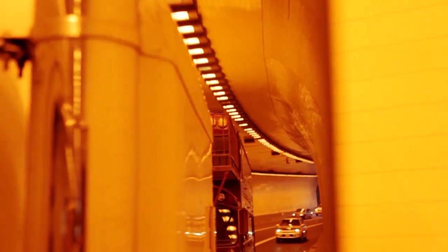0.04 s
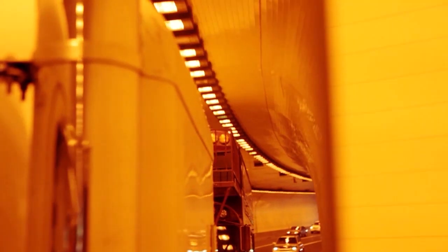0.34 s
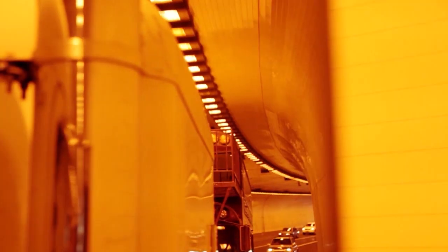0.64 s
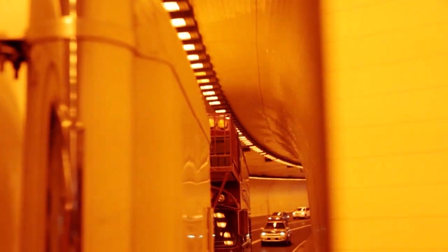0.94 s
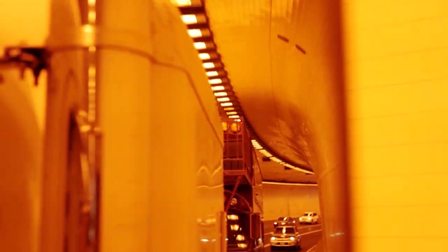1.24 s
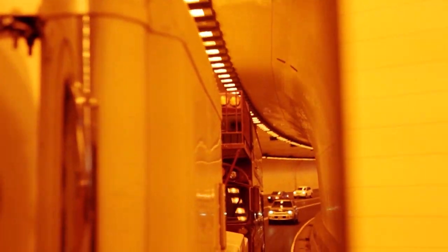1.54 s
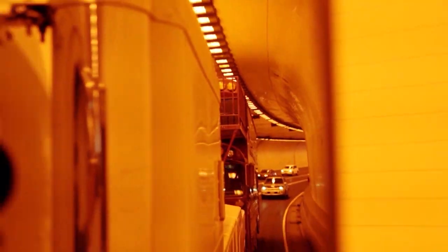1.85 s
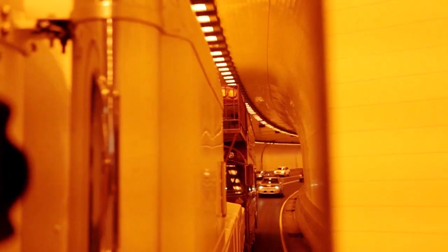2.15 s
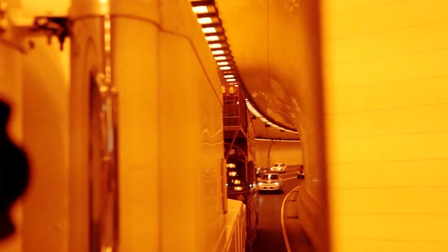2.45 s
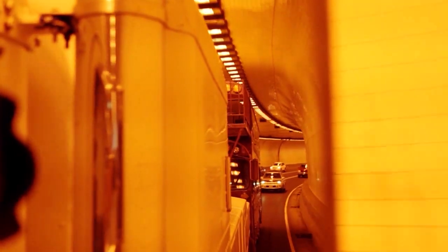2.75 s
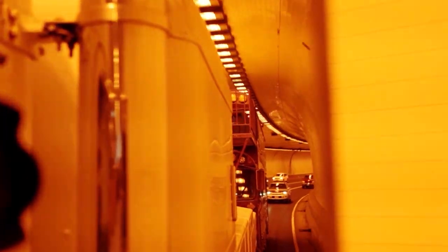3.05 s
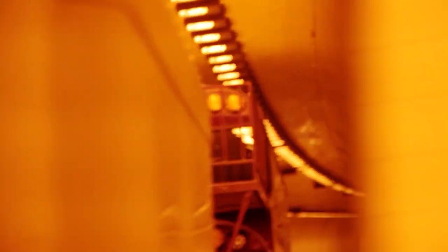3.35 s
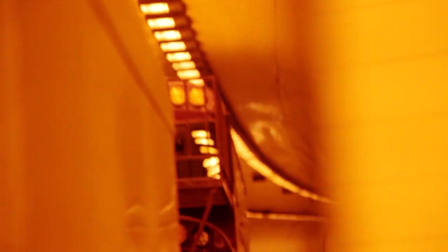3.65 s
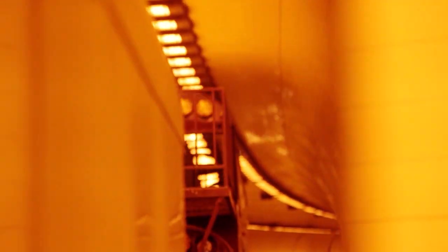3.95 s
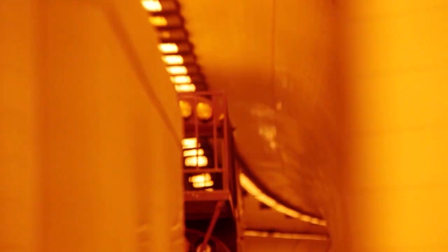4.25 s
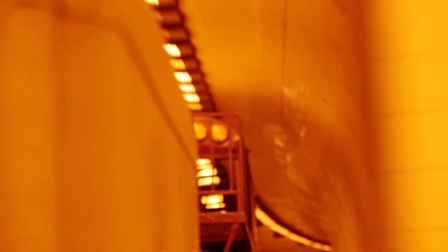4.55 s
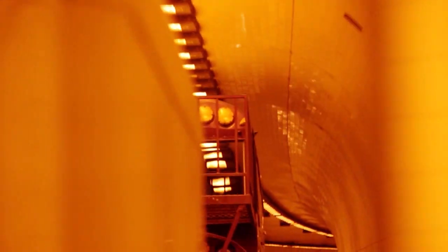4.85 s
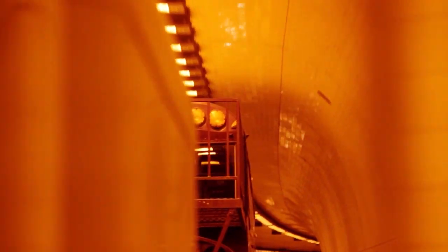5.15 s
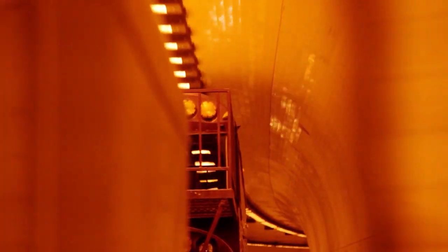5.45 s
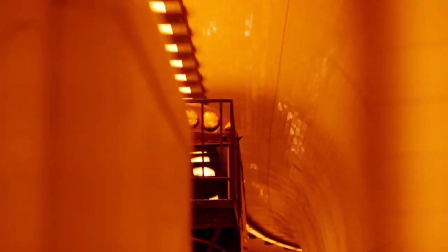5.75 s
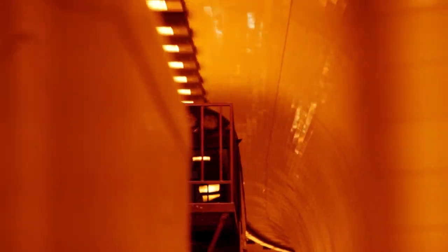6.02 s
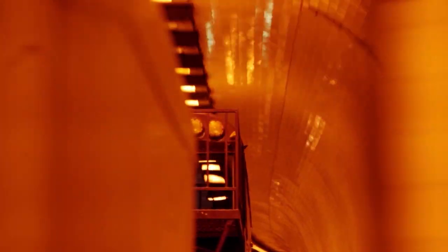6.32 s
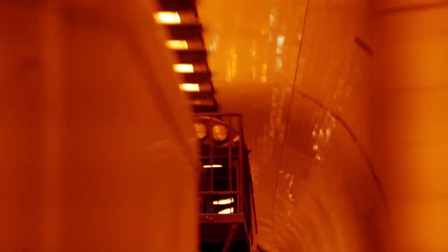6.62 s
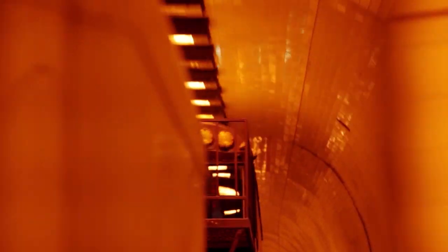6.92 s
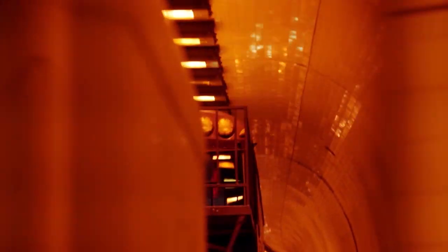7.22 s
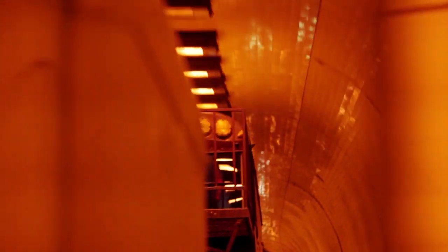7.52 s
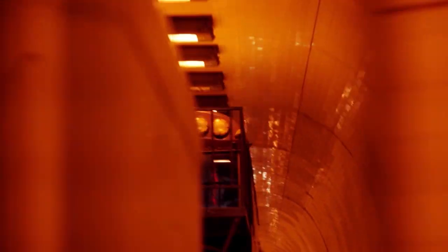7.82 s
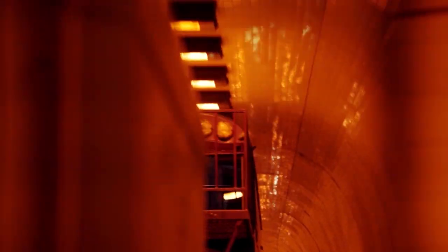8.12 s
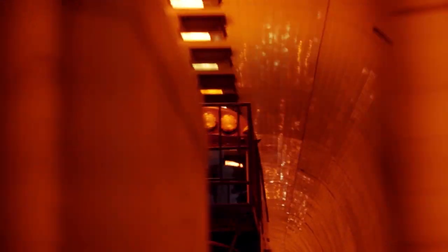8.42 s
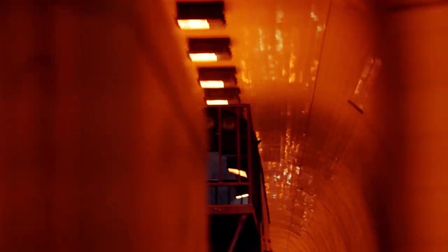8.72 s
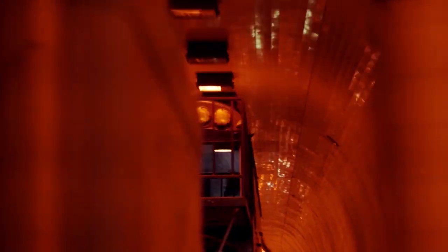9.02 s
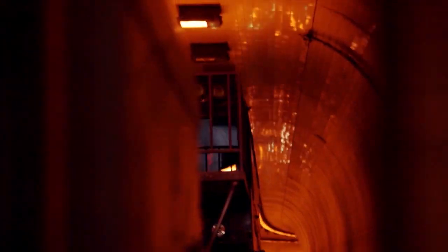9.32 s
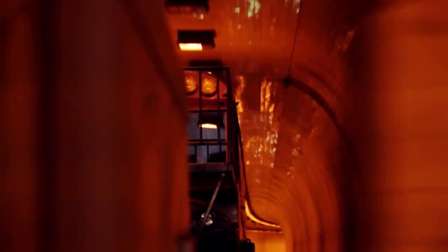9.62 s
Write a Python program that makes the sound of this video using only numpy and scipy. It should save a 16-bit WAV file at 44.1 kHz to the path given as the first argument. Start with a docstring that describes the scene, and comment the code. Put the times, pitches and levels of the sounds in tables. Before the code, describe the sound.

Heard from a work vehicle moving close to a road tunnel's wall, a diesel engine runs loudly and evenly throughout, with a booming, raspy exhaust and rapid knocking clatter. At the start there is a soft low gust on the microphone, a tiny metal squeak and a brief thin hiss. The drone then carries on over a dull tunnel roar, its upper tones slowly rising and falling in strength.

```python
"""A six-cylinder diesel drones at about 1600 rpm, heard on board a work vehicle in a road tunnel.
Uneven firings ring the exhaust pipe and knock on the block, which growls and clatters; its higher
tones swell and fade as the close walls slide by. Behind it are the tunnel's roar, a little wind on
the microphone and, in the first second, a faint squeak and a thin hiss."""
import sys
import numpy as np
from scipy import signal
from scipy.fft import rfft, irfft, next_fast_len
from scipy.io import wavfile
from scipy.ndimage import map_coordinates

SR = 44100
rng = np.random.default_rng(int(sys.argv[2]) if len(sys.argv) > 2 else 0)


def wrap_up_sound(samples):
    """Save the sound to the file named by the first command line argument, as 16-bit audio."""
    columns = np.atleast_2d(samples).T
    # keep every value between -1 and 1, then stretch to whole-number steps
    tamed = np.clip(columns, -1, 1)
    steps = np.round(tamed * 32767).astype(np.int16)
    wavfile.write(sys.argv[1], SR, steps)


N = 430857
TIME = np.arange(N) / SR

# slowly sagging engine speed: (time [s], speed [rpm])
ENGINE_RPM = [(0.0, 1635.4), (0.8, 1631.0), (1.6, 1624.7), (2.4, 1620.3), (3.0, 1615.4), (4.0, 1610.6),
              (5.0, 1604.6), (6.0, 1600.2), (7.0, 1599.0), (8.0, 1598.0), (9.0, 1597.6), (9.77, 1598.0)]


def amp(db):
    """Decibels to gain."""
    return 10 ** (np.asarray(db) / 20)


def unit_rms(x):
    """Scales to rms 1."""
    return x / np.sqrt(np.mean(abs(x) ** 2) + 1e-20)


def curves(rows):
    """Each column after the first as a curve over time."""
    times_s, *columns = np.transpose(rows)
    return [np.interp(TIME, times_s, column) for column in columns]


def hump(middle_s, length_s, flatness=2):
    """Smooth rise and fall of height 1; flatness 2 is a bell, more tends to a plateau."""
    return np.exp(-abs(2 * (TIME - middle_s) / length_s) ** flatness)


def drift(rate_hz, size=2048):
    """Slow complex random curve of rms 1, up to about rate_hz."""
    hz = np.fft.fftfreq(size, TIME[-1] / size)
    white = rng.standard_normal(size) + 1j * rng.standard_normal(size)
    slow = np.fft.ifft(np.exp(-(hz / rate_hz) ** 2) * white)
    return np.interp(TIME, np.linspace(0, TIME[-1], size), unit_rms(slow))


def coloured(x, spectrum, rings=()):
    """Shapes x by a spectrum with narrow rings on top; rms 1."""
    size = next_fast_len(N)
    hz = np.fft.rfftfreq(size, 1 / SR)
    points_hz, points_db = np.transpose(spectrum)
    db = np.interp(np.log(hz + 1), np.log(points_hz + 1), points_db)
    db += sum(lift / (1 + (2 * (hz - centre) / width) ** 2) for centre, width, lift in rings)
    return unit_rms(irfft(rfft(x, size) * amp(db), size)[:N])


def noise(spectrum):
    """Noise of rms 1 with the given spectrum."""
    return coloured(rng.standard_normal(N), spectrum)


def tunnel_roar(knock, level_db=-30.5, wander_db=.8, throb=.14):
    """Tyres and engine blurred by the tunnel, throbbing a little with the knocks."""
    # (frequency [Hz], relative density [dB])
    spectrum = [(20, -59), (70, 0.5), (110, -9), (170, -0.5), (235, -3.5), (275, -15), (330, 1),
                (390, -4.5), (550, -3.5), (670, -10), (900, -7.5), (1330, -15), (1550, -22), (3000, -59)]
    gain = amp(level_db + wander_db * drift(3).real)
    return gain * unit_rms(noise(spectrum) * (1 + throb * knock))


def wind(breeze_db=-40, lumps_db=5, gust_db=-25):
    """Low, lumpy buffeting on the microphone and one early gust."""
    # (frequency [Hz], relative density [dB])
    spectrum = [(4, 10), (12, 1), (28, 0), (50, -3), (100, -10), (300, -68)]
    breeze = amp(breeze_db + lumps_db * drift(1.5).real)
    gust = amp(gust_db) * hump(middle_s=.22, length_s=.55)
    return (breeze + gust) * noise(spectrum)


def hiss(level_db=-52):
    """One short, thin, very high hiss."""
    # (frequency [Hz], relative density [dB])
    spectrum = [(9000, -62), (11400, -17), (12000, 2), (13500, -4), (15600, -5)]
    return amp(level_db) * hump(middle_s=.635, length_s=.08) * noise(spectrum)


def body_squeak(level_db=-42, pitch_hz=3770):
    """Bodywork metal rubs in one short, wavering chirp."""
    tone = np.sqrt(2) * np.cos(2 * np.pi * pitch_hz * TIME + drift(30).real)
    return amp(level_db) * hump(middle_s=.355, length_s=.05) * tone


def crank_turns(first_firing_turns=.115, wobble_turns=.0023):
    """Crankshaft turns since the first firing, slightly unsteady."""
    rpm, = curves(ENGINE_RPM)
    return np.cumsum(rpm) / 60 / SR - first_firing_turns + wobble_turns * drift(6).real


def knock_envelope(turns, rise_gaps=.05, decay_gaps=.46, cylinders=6):
    """Combustion knocks, three a turn, timed in firing gaps; rms 1."""
    # cylinders in firing order: (relative knock [dB])
    cylinder_db = [-14, 0, -4, -14, -6, -8]
    firings = turns * cylinders / 2 + cylinders
    number, age = firings.astype(int), firings % 1
    scatter_db = rng.standard_normal(1024)
    strength = amp(np.take(cylinder_db, number % cylinders) + scatter_db[number])
    return unit_rms(strength * (1 - np.exp(-age / rise_gaps)) * np.exp(-age / decay_gaps))


def cycle_rattle(turns, renew_s, size=3000):
    """Noise that repeats every engine cycle (two turns) and slowly renews as the echoes change."""
    patterns = rng.standard_normal((128, size))
    place = turns / 2 % 1 * size
    stage, blend = np.divmod(TIME / renew_s, 1)
    old = map_coordinates(patterns, [stage, place], order=1, mode="grid-wrap")
    new = map_coordinates(patterns, [stage + 1, place], order=1, mode="grid-wrap")
    return unit_rms(old * np.cos(np.pi / 2 * blend) + new * np.sin(np.pi / 2 * blend))


def head_ping(turns, knock, level_db=-43, centre_hz=1987, width_hz=390):
    """The harder knocks briefly ring the cylinder head."""
    # (time [s], level offset [dB])
    offsets = [(0, -2), (2, 3), (6, -3), (8, -2)]
    offset_db, = curves(offsets)
    band = signal.butter(2, [centre_hz - width_hz / 2, centre_hz + width_hz / 2], "band", fs=SR)
    strikes = knock * cycle_rattle(turns, renew_s=.514)
    return amp(level_db + offset_db) * unit_rms(signal.lfilter(*band, strikes))


def clatter(turns, knock, level_db=-34, flicker_db=.72, fade_db=1.2, echo_s=.03, split_hz=6000):
    """Bright mechanical bursts at each knock, their wall echoes and an even wash, slowly softening."""
    # (frequency [Hz], relative density [dB])
    spectrum = [(900, -24.5), (1400, -4), (1550, -8), (2000, -4.5), (2300, -11), (2950, -9), (3300, -14.5),
                (4300, -19), (5000, -23), (6000, -26.5), (8000, -29.5), (12200, -30.5), (13800, -41),
                (15300, -53)]
    # engine parts: (frequency [Hz], width [Hz], lift [dB])
    rings = [(3710, 130, 2.5), (4310, 99, 4.5), (6740, 150, 5), (7240, 130, 5), (9000, 550, 2)]
    pole = np.exp(-1 / (echo_s * SR))
    echo_power = signal.lfilter([1 - pole], [1, -pole], knock ** 2)
    envelope = unit_rms(np.sqrt(.5 + .13 * knock ** 2 + .19 * echo_power))  # wash, bursts, echoes
    rattle = cycle_rattle(turns, renew_s=.6) + rng.standard_normal(N)
    body = signal.sosfiltfilt(signal.butter(1, split_hz, fs=SR, output="sos"), rattle)
    treble = rattle - body
    pulsed = body * envelope + treble * unit_rms(np.sqrt(envelope))  # treble pulses less
    gain = amp(level_db + flicker_db * drift(7.3).real + fade_db * (.5 - TIME / TIME[-1]))
    return gain * coloured(pulsed, spectrum, rings)


def block_growl(turns, knock, level_db=-26, throb=.34):
    """The block shudders alike in every cycle: a dense comb of tones, pulsing with the knocks."""
    # (frequency [Hz], relative density [dB])
    spectrum = [(120, -0.5), (235, 6), (330, 1.5), (400, -0.5), (500, 0), (660, -1.5), (800, -0.5),
                (900, -0.5), (1030, -7), (1230, -1), (1390, -0.5), (1540, -27.5), (2200, -39)]
    shudder = cycle_rattle(turns, renew_s=.4)
    return amp(level_db) * coloured(shudder * (1 + throb * knock), spectrum)


def block_tones(turns, trim_db=.46, rest_db=-41, lope=.22, twist_rad=.018, shimmer=.16):
    """The block's strongest tones wander faintly and swell as moving wall echoes reinforce them."""
    # (order [per turn])
    orders = [28, 31, 34, 37, 40, 43]
    # (middle [s], length [s], order [per turn], level before trim [dB])
    swells = [(.4, 1.1, 28, -34.5), (0.448, 1.34, 34, -29.5), (.45, 1.3, 40, -33), (1.148, 0.37, 43, -34),
              (1.35, 0.95, 31, -32), (2.085, 1.05, 40, -29), (2.7, 0.89, 43, -34.5), (2.9, 1, 31, -37.5),
              (3.1, 1.14, 34, -27.5), (3.9, 2.25, 28, -32), (4.102, 1.8, 43, -33.5), (5.15, 0.74, 40, -30),
              (5.55, 1.55, 34, -30), (6.5, 1.2, 37, -33.5), (6.545, 0.43, 43, -33.5),
              (6.7, 0.85, 40, -32.5), (8.2, 2.75, 34, -32), (9.355, 0.6, 43, -33)]
    angle = 2 * np.pi * (turns - 1 / 3)
    # the loudest cylinder fires every second turn: it lifts the tones and twists the crankshaft
    loping = 1 + lope * np.cos(angle / 2 - np.pi / 4)
    angle += twist_rad * np.sin(angle / 2)
    tones = np.zeros(N)
    for order in orders:
        gain = amp(rest_db) * drift(2.1)
        for middle_s, length_s, swell_order, swell_db in swells:
            if swell_order == order:
                gain += (amp(swell_db) - gain) * hump(middle_s, length_s, flatness=2.54)
        tones += (gain * (1 + shimmer * drift(3.7)) * np.exp(1j * order * angle)).real
    return np.sqrt(2) * amp(trim_db) * loping * tones


def pipe_phases(orders, crank_hz):
    """Phase [rad] of each tone as two strong puffs and a weak one per turn ring the exhaust pipe."""
    # (place [turns], relative size)
    puffs = [(-.011, 1.), (.343, 1.04), (.658, .37)]
    # (frequency [Hz], width [Hz], signed gain)
    resonances = [(209, 176, .37), (342, 18, -1.), (544, 131, -.29)]
    hz = orders * crank_hz
    drive = sum(size * np.exp(-2j * np.pi * orders * place) for place, size in puffs)
    response = sum(gain / (1 + 1j * (hz ** 2 - centre ** 2) / (hz * width))
                   for centre, width, gain in resonances)
    return np.angle(drive * response)


def exhaust(turns, rasp_trim_db=-.5, rasp_swing=1.26):
    """Uneven puffs make each turn a chug of boom and rasp; wall echoes shake the tones, the boom least."""
    # (order [per turn], base level [dB])
    harmonics = [(1, -48), (2, -41.9), (3, -29.2), (4, -42.0), (5, -34.9), (6, -25.8), (7, -32.4),
                 (8, -21.3), (9, -16.3), (10, -46.7), (11, -29.2), (12, -25.6), (13, -25.4), (14, -41.1),
                 (15, -38.3), (16, -34.4), (17, -35.4), (18, -29.7), (19, -32.8), (20, -33.6), (21, -35.5),
                 (22, -31.3), (23, -42.3)]
    # (order [per turn]); all higher orders form the rasp
    boom_orders = [3, 6, 8, 9, 12, 13]
    # only the swing about the mean counts: (time [s], boom [dB], rasp before rasp_swing [dB])
    swings = [(0.1, -17, -24), (0.63, -17, -25), (1.92, -15, -21.5), (3.03, -18, -24.5), (3.93, -15, -26),
              (5.23, -14.5, -24.5), (5.94, -13.5, -23), (6.26, -16.5, -23.5), (6.58, -14, -24),
              (7.06, -14.5, -23.5), (7.14, -14.5, -24.5), (8.59, -14.5, -23.5), (9.2, -14.5, -23.5),
              (9.6, -14.5, -24.5)]
    # tones on the flank of a pipe resonance follow the speed: (order [per turn], slope [dB/rpm])
    flanks = [(3, .08), (4, 0.41), (6, -0.01), (8, 0.1065), (11, .06), (13, -0.1841), (16, 0.11),
              (17, -.15), (19, 0.1374)]
    rpm, = curves(ENGINE_RPM)
    boom_db, rasp_db = (db - db.mean() for db in curves(swings))
    orders, levels_db = np.transpose(harmonics)
    phases = pipe_phases(orders, crank_hz=turns[-1] / TIME[-1])
    tones = np.zeros(N)
    for order, base_db, phase in zip(orders, levels_db, phases):
        if order in boom_orders:
            lift_db, flutter = boom_db, .11
        elif order > max(boom_orders):
            lift_db, flutter = rasp_trim_db + rasp_swing * rasp_db, .3
        else:
            lift_db, flutter = 0, .31
        flank_db = dict(flanks).get(order, 0) * (rpm - rpm.mean())
        echoes = 1 + flutter * drift(1.2) + .05 * drift(7)
        gain = amp(base_db + lift_db + flank_db) * echoes
        tones += (gain * np.exp(1j * (2 * np.pi * order * turns + phase))).real
    return np.sqrt(2) * tones


def scene():
    """Mono mix on board; all engine layers follow one crankshaft."""
    turns = crank_turns()
    knock = knock_envelope(turns)
    engine = exhaust(turns) + block_tones(turns) + block_growl(turns, knock)
    engine += clatter(turns, knock) + head_ping(turns, knock)
    return (engine + tunnel_roar(knock) + wind() + hiss() + body_squeak())[None]


def record(dry, cutoff_hz=15700):
    """Steep low-pass band limit."""
    lowpass = signal.firwin(511, cutoff_hz, window=("kaiser", 9), fs=SR)
    return signal.oaconvolve(dry, lowpass[None], "same")


dry = scene()
out = record(dry)
wrap_up_sound(out)
```